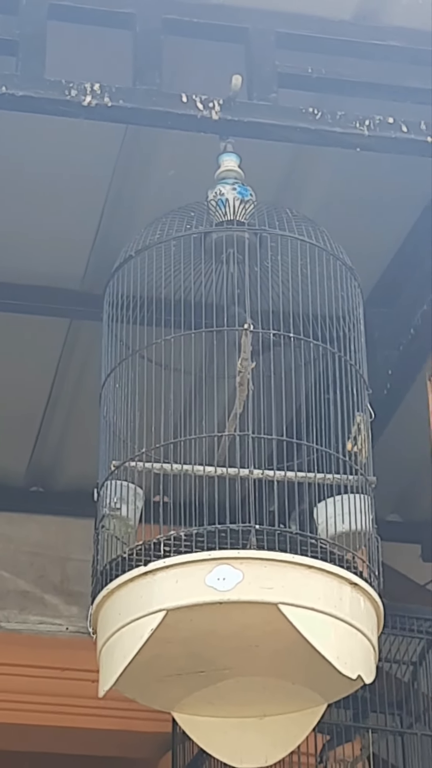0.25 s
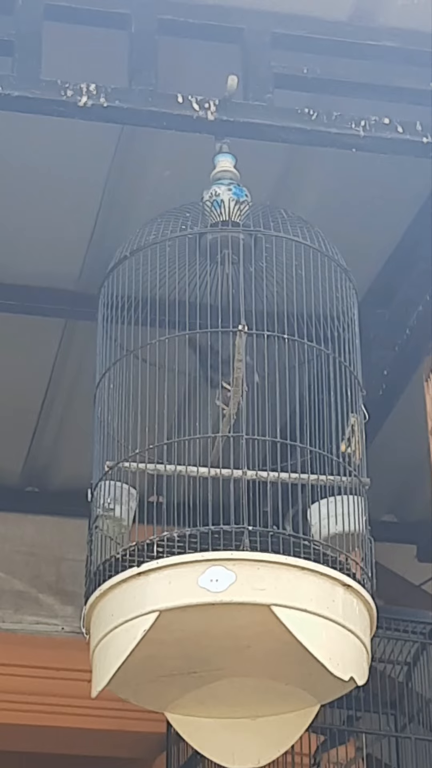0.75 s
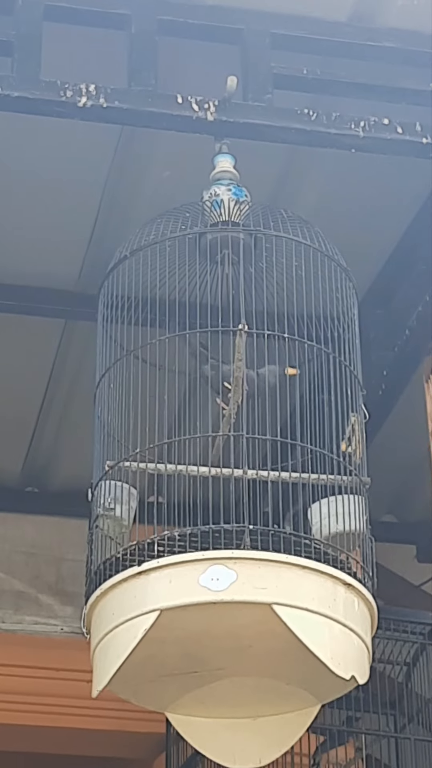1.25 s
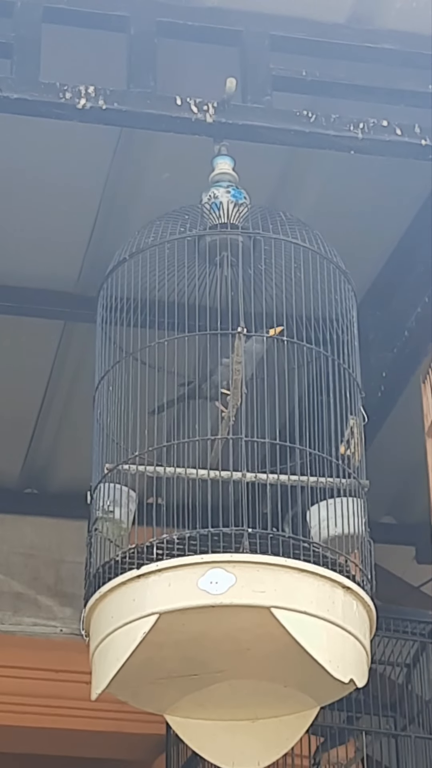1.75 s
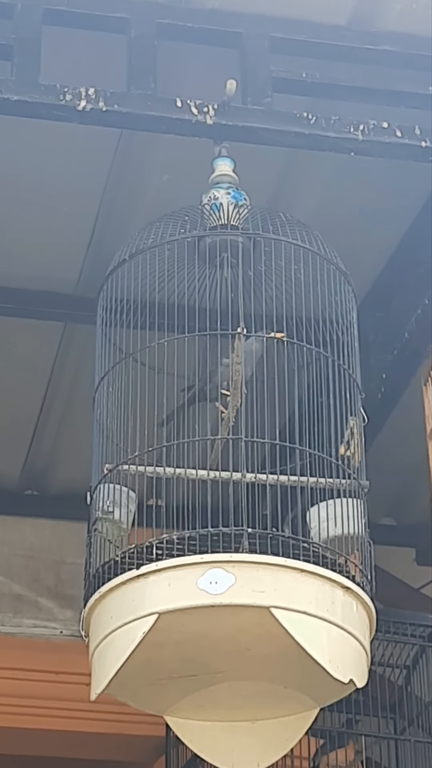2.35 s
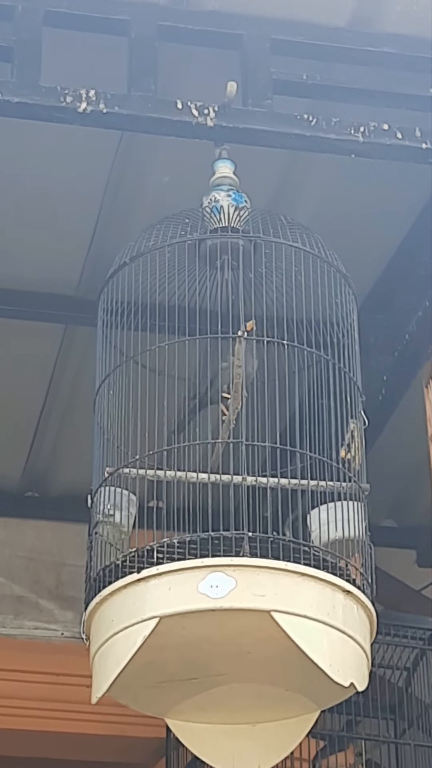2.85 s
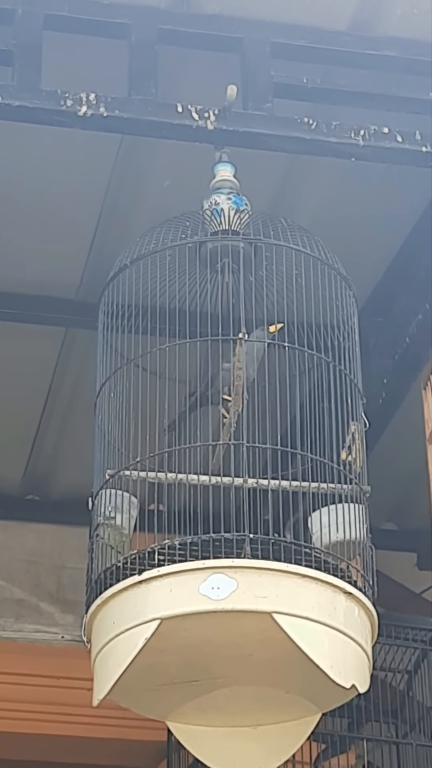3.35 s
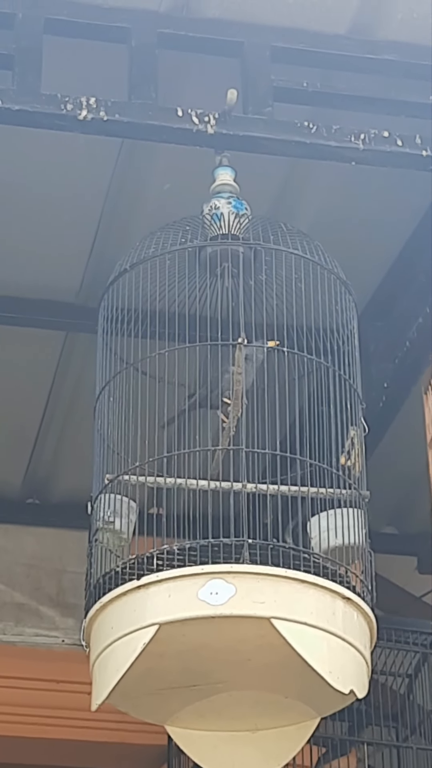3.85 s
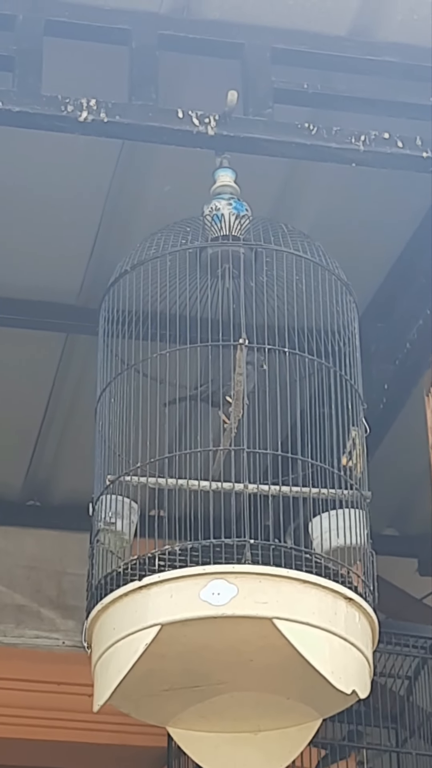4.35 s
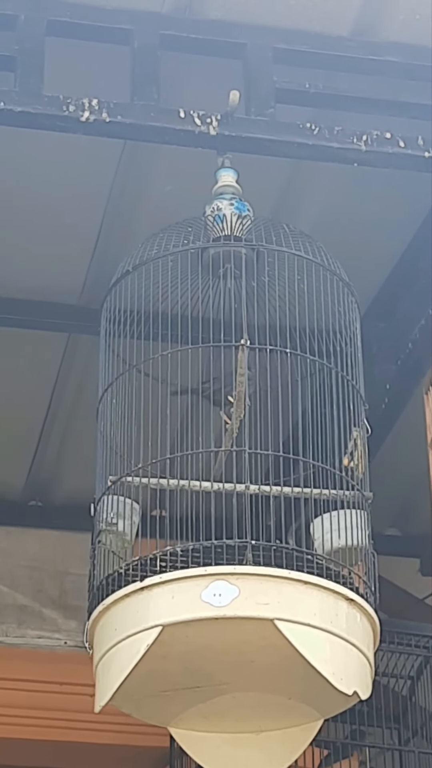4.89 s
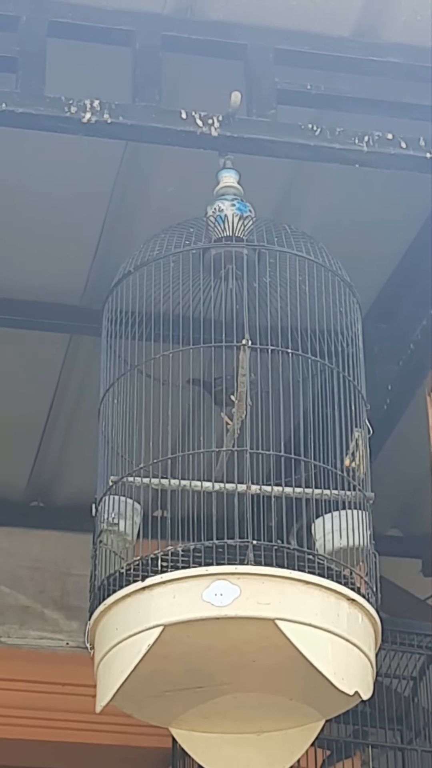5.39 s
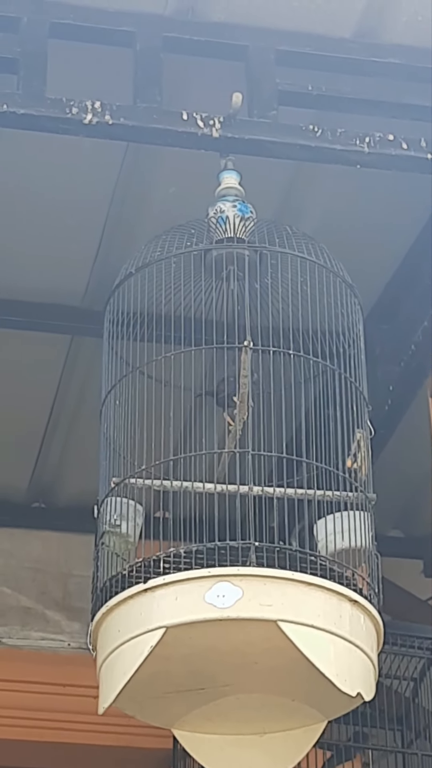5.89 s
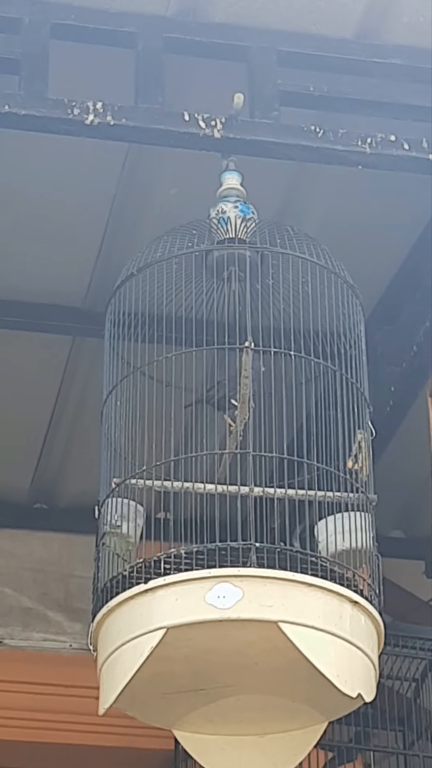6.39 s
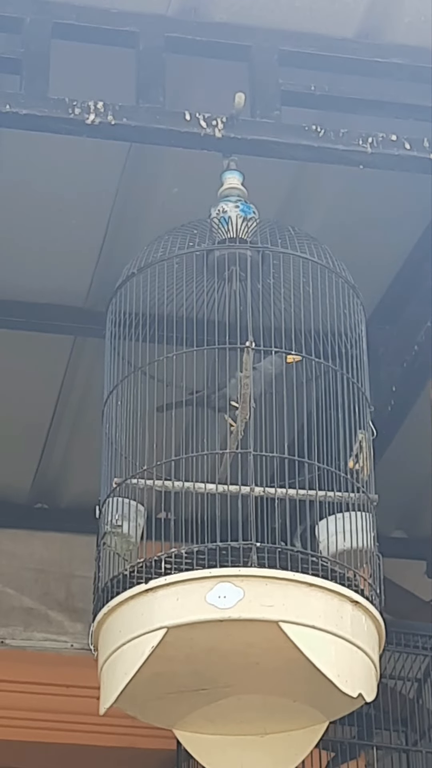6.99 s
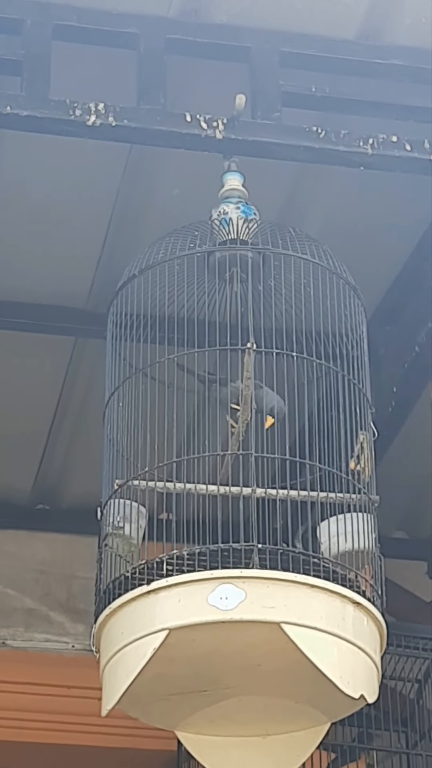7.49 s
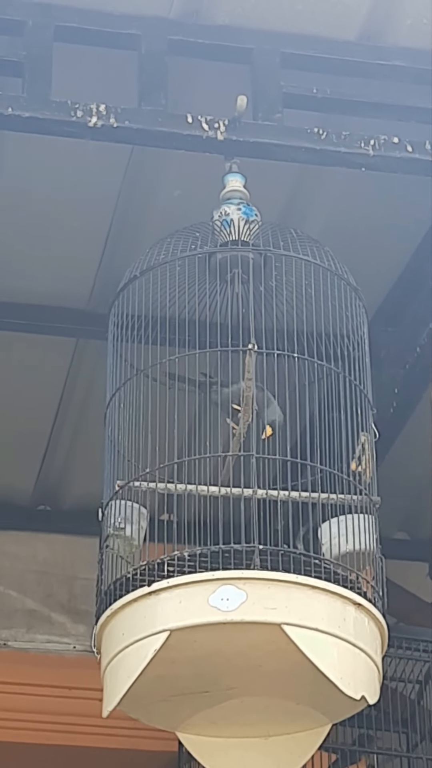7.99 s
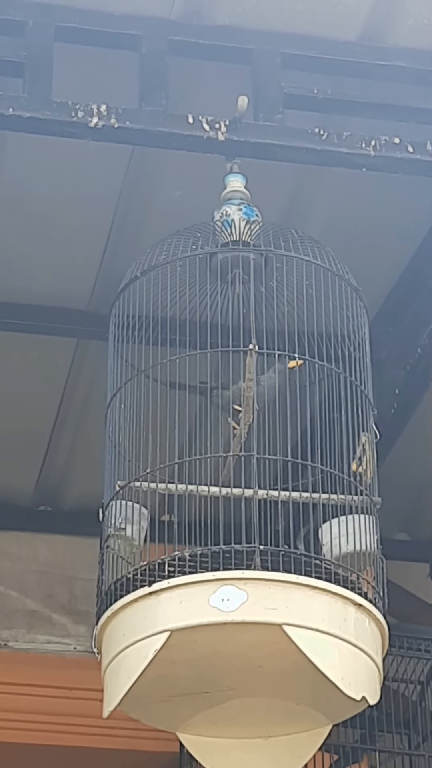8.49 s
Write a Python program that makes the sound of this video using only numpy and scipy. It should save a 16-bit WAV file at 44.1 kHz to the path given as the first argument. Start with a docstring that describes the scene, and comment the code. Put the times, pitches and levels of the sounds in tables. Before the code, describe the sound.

A clear falling whistle starts at once with a hoarse note and the tail of a buzz, followed by bright pips until 0.4 s and buzzes to 0.8 s. Quick rising chirps run from 0.5 to 1.1 s, two high arched chirps come near 1.0 and 1.2 s, and raspy scratches near 1.1-1.6 s. It thins out, with small falling chirps from 2.3 s. Mellow rising whistles at 2.9 and 3.3 s lead into a dense whistled cluster at 3.6-4.1 s. Wavering buzzes repeat from 4.2 to 5.9 s amid sharp downward chirps. Slurred whistles return at 6.4-7.1 s, mixed with rasps and scratches until 7.7 s. After a sparser moment, rising whistles at 8.2 and 8.6 s finish with high chirps. Short dense porch echoes, wavering hiss and low distant engine rumble, stronger around 4.6-6 s, accompany everything.

```python
"""A short clear whistle comes first, with a hoarse note and the end of a buzz, over low distant rumble.
Then a songbird in a hanging wire cage and other caged birds mix whistles, buzzes, scratches and chirps.
The voices are wavering tones with overtones and breath; the scratches are bursts of filtered noise.
The hard porch roof and walls answer with dense echoes made of fading noise.
Broad hiss and far traffic are coloured noise that rises and falls."""
import sys
import numpy as np
from scipy import signal
from scipy.fft import rfft, irfft
from scipy.io import wavfile
from scipy.ndimage import uniform_filter1d

SR = 44100
rng = np.random.default_rng(int(sys.argv[2]) if len(sys.argv) > 2 else 0)


def pcm_store(signal):
    """Save signal as 16-bit PCM."""
    levels = np.round(np.clip(np.atleast_2d(signal), -1, 1) * 32767)
    wavfile.write(sys.argv[1], SR, levels.astype(np.int16).T)


def attenuation_scalar(level_db):
    """Turn a level in dB into a linear amplitude multiplier (20 dB per decade)."""
    decades = np.asarray(level_db, float) / 20
    return 10 ** decades


N = 385434  # samples in the scene

# All note levels below are those before the scene is mixed.
# whistles that swell while they slur: [start t/s, length t/s, start f/Hz, end f/Hz, peak level/dB]
SLUR_NOTES = [(0, 0.073, 2926, 2685, -25), (2.92, .28, 2047, 2220, -23.5), (3.33, 0.19, 1676, 1867, -25),
              (4.38, 0.071, 2900, 2954, -37), (6.42, .22, 2090, 2238, -21), (6.72, 0.059, 1838, 1960, -26),
              (7.025, 0.083, 1952, 2094, -24.5), (8.22, .25, 1849, 2192, -21.5),
              (8.57, 0.13, 2640, 2854, -20.5)]
# struck whistles that slip onto their pitch: [start t/s, length t/s, start f/Hz, held f/Hz, peak level/dB]
PIP_NOTES = [(.135, .1, 2310, 2104, -22.5), (.22, 0.1, 2410, 2570, -47), (.335, 0.023, 3430, 3790, -28),
             (.373, 0.017, 3780, 3840, -21), (1.08, 0.043, 4890, 4970, -38.5),
             (1.28, 0.11, 5660, 5430, -47), (1.787, 0.011, 3690, 4030, -37), (1.84, 0.011, 3900, 4430, -41),
             (3.575, 0.039, 3650, 3880, -36.5), (3.642, 0.027, 2650, 2800, -20),
             (3.655, 0.1, 4880, 5020, -46), (3.8, 0.017, 3700, 3880, -35), (3.67, 0.11, 2475, 2210, -24.5),
             (3.83, 0.072, 2830, 3200, -28.5), (3.885, .1, 2426, 2300, -28), (4.13, 0.072, 4450, 4230, -36),
             (8.325, 0.12, 3880, 4020, -34.5) ]
# whistles that slow down near their end: [start t/s, length t/s, start f/Hz, end f/Hz, peak level/dB]
GLIDE_NOTES = [(3.605, 0.053, 3900, 4710, -43), (3.612, 0.047, 1986, 2700, -37),
               (3.815, 0.028, 3850, 4650, -48), (4.04, 0.1, 3290, 4475, -37.5),
               (6.765, .095, 2086, 3137, -29), (8.18, 0.064, 1613, 1475, -44.5)]
# hoarse even glides: [start t/s, length t/s, start f/Hz, end f/Hz, peak level/dB]
RASP_NOTES = [(0, 0.064, 1770, 1820, -41), (1.42, 0.24, 1289, 2317, -39), (2.58, 0.023, 1010, 985, -47.5),
              (2.77, 0.046, 1115, 1038, -48.5), (3.5, .12, 1252, 1706, -45), (4.93, 0.091, 1259, 1502, -44),
              (5.03, 0.09, 1670, 2004, -43.5), (6.25, 0.045, 1028, 1025, -49.5),
              (6.47, 0.061, 1427, 1115, -43), (6.94, 0.15, 1492, 1560, -45), (7.27, .18, 1371, 1634, -46),
              (7.7, 0.12, 1476, 1897, -46), (6.8, .1, 1180, 1507, -44), (7.17, 0.061, 3013, 3550, -35),
              (7.21, 0.046, 3647, 3420, -29), (7.26, 0.077, 3510, 3600, -40.5),
              (7.49, 0.06, 1355, 1635, -42.5), (7.56, 0.11, 1682, 2356, -37.5)]
# wide buzzing bands: [start t/s, length t/s, start f/Hz, end f/Hz, peak level/dB]
BUZZ_NOTES = [(0, 0.013, 3720, 3820, -36.5), (.35, 0.12, 4130, 3797, -35), (0.677, 0.15, 3930, 3555, -36.5),
              (4.095, 0.029, 3800, 3820, -41.5), (4.16, 0.18, 3693, 3890, -39.5),
              (4.474, 0.13, 3900, 3770, -39), (4.802, .22, 4242, 4170, -34.5),
              (5.211, 0.15, 4136, 3670, -34), (5.509, 0.2, 4220, 3554, -32),
              (5.868, 0.088, 3550, 3480, -49.5)]
# scratchy noise bursts: [start t/s, length t/s, low f/Hz, high f/Hz, level/dB]
SCOLD_BURSTS = [(0.101, 0.22, 990, 1900, -62), (0.19, 0.098, 4400, 5360, -50.5),
                (0.82, 0.1, 1000, 2280, -49.5), (1.11, 0.016, 2180, 8000, -30.5),
                (1.248, 0.091, 1730, 4300, -38), (1.375, 0.091, 2230, 3800, -41.5),
                (1.519, 0.12, 2500, 9400, -35), (1.913, 0.032, 7950, 15000, -50.5),
                (2.231, 0.18, 1750, 5830, -55), (3.55, 0.072, 2150, 5560, -49),
                (3.656, 0.047, 3170, 8500, -41), (3.828, 0.02, 6500, 6950, -37.5),
                (3.85, 0.018, 4030, 6340, -27.5), (3.95, 0.012, 4500, 9800, -43.5),
                (4.162, 0.11, 1670, 2490, -45), (4.683, 0.49, 2110, 3540, -48.5),
                (4.96, 0.11, 2350, 3420, -48), (5.882, 0.085, 4250, 8500, -39),
                (6.178, 0.034, 4700, 5950, -46.5), (6.262, 0.061, 1280, 3680, -41),
                (6.894, 0.11, 1890, 4150, -39), (7.27, 0.12, 2520, 3500, -46),
                (7.462, 0.091, 1200, 4670, -39.5), (7.544, 0.11, 2420, 8900, -41.5),
                (8.18, 0.21, 1280, 5150, -44)]
# quick sweeps: [start t/s, length t/s, start f/Hz, end f/Hz, peak level/dB]
CHIRP_NOTES = [(0.513, 0.014, 2740, 3770, -42), (0.596, 0.024, 2620, 4870, -37.5),
               (0.832, 0.03, 3610, 5950, -34.5), (0.911, 0.018, 3210, 5700, -36.5),
               (0.986, 0.044, 3100, 5730, -40.5), (1.06, 0.016, 3200, 4520, -36),
               (1.11, 0.01, 4300, 2520, -41), (1.347, 0.022, 2950, 5300, -46),
               (1.737, 0.0067, 2600, 3720, -48), (1.781, 0.0041, 2480, 4000, -37),
               (1.828, 0.012, 3210, 4600, -43), (2.339, 0.061, 4440, 1870, -45),
               (2.488, 0.06, 4430, 2240, -38), (2.609, 0.021, 5700, 3190, -35.5),
               (2.774, 0.028, 4700, 3220, -39.5), (2.983, 0.083, 5670, 3040, -43),
               (3.184, 0.095, 4910, 3220, -39), (3.353, 0.054, 5570, 4060, -49),
               (3.398, 0.055, 4200, 2765, -34), (5.02, 0.014, 4280, 5290, -35.5),
               (5.188, 0.019, 5000, 2920, -37.5), (5.382, 0.021, 5700, 2800, -30.5),
               (5.455, 0.018, 5500, 2530, -40.5), (5.506, 0.012, 4270, 2880, -46),
               (5.599, 0.014, 3600, 2320, -42), (5.86, 0.045, 4470, 2475, -45.5),
               (5.976, 0.014, 3120, 1990, -46), (6.09, 0.029, 5000, 1854, -44.5),
               (6.215, 0.041, 4420, 1925, -40), (6.327, 0.04, 5560, 4620, -40),
               (6.358, 0.031, 4190, 2060, -41), (6.691, 0.054, 5300, 2350, -39),
               (6.872, 0.043, 4720, 3250, -35), (7.065, 0.07, 5160, 3150, -35),
               (7.243, 0.08, 4620, 3950, -42), (7.518, 0.018, 4460, 3300, -36),
               (7.888, 0.04, 4430, 3000, -50), (7.96, 0.01, 3970, 2650, -42.5),
               (8.423, 0.028, 3180, 2720, -44.5), (8.683, 0.038, 3600, 6650, -38.5)]
# chirps up, over the top and down: [start t/s, length t/s, top f/Hz, end f/Hz, peak level/dB]
HOOK_NOTES = [(1.034, 0.049, 7090, 4800, -33.5), (1.193, .058, 7120, 2238, -34),
              (8.688, 0.039, 7000, 5180, -33)]
# how the throat colours the overtones: [f/Hz, level/dB]
THROAT_COLOUR = [(2000, 5), (4000, -1), (5800, 3.5), (7600, -2.5), (9700, -13.5), (11500, -0.5),
                 (13500, -10.5), (15200, -4), (19000, -51)]
# relative spectrum of air rushing past the membrane: [f/Hz, level/dB]
BREATH_COLOUR = [(710, -20.5), (1200, -15), (1570, -17), (2430, -9), (3110, -8), (3980, -6), (4530, -18.5),
                 (15500, -31)]
# relative level of the broad hiss: [t/s, level/dB]
HISS_LEVEL = [(0.0, -54), (0.46, -57), (1.19, -51.5), (1.51, -42.5), (1.68, -64), (2.14, -60.5),
              (2.46, -45.5), (2.94, -56.5), (3.72, -49), (3.97, -53.5), (4.38, -45), (4.65, -78),
              (5.57, -43.5), (6.08, -61), (7.01, -52), (8.23, -66.5), (8.37, -55), (8.74, -63)]
# relative spectrum of the hiss: [f/Hz, level/dB]
HISS_COLOUR = [(700, -1), (1500, -1.5), (3000, 1), (4500, 0.5), (7000, -5.5), (11000, -7.5), (15500, -5)]
# strength of the far engines: [t/s, level/dB]
RUMBLE_LEVEL = [(0.0, -41), (2.02, -53), (4.4, -45.5), (4.63, -36), (5.77, -42), (6.01, -37.5),
                (7.42, -49.5), (7.64, -44.5), (8.74, -51.5)]
# low resonances of the far engines: [f/Hz, width f/Hz, relative level/dB]
RUMBLE_RESONANCES = [(108.9, 60, -0.5), (179.5, 92, -4.5), (297.2, 14.4, -12)]
# relative spectrum of far traffic and air: [f/Hz, level/dB]
TOWN_COLOUR = [(18, -15), (30, -0.5), (137, -5.5), (230, -8.5), (299, -0.5), (432, -9.5), (1200, -24),
               (1820, -28), (4780, -46), (15500, -53)]

LOUD_DB = -24  # a loud note: effort is counted from here
CLEAR, SWING = 0.7, 0.6  # how clearly effort shows in the whistles; how freely the pitch swings
SLUR_FROM, SLUR_TO, SLUR_PEAK = 0.2, 0.7, 0.57  # shares of the note: slur starts, slur ends, loudest
SLUR_SWELL_DB, SLUR_FADE_DB = 21, 13.5
PIP_SLIP_S, PIP_ATTACK_S = 0.0131, 0.031
PIP_SWELL_DB, PIP_FADE_DB = 8, 13
GLIDE_PEAK, GLIDE_SWELL_DB, GLIDE_FADE_DB = 0.6, 6, 3
RASP_PEAK, RASP_SWELL_DB, RASP_FADE_DB = 0.55, 4, 4
RASP_PURE_HZ, RASP_DULL_DB_PER_KHZ = 1566, 16.5  # above this pitch the overtones drop away
BUZZ_PEAK, BUZZ_SWELL_DB, BUZZ_FADE_DB = 0.44, 6, 8
PORCH_T60_S, PORCH_TREBLE_T60_S = 0.36, 0.29  # times for the echo to fall by 60 dB
PORCH_DB = -0.5
BEAK_HZ, BEAK_WIDTH_HZ = 3750.0, 650.0
HOOK_START = 0.72  # start pitch over top pitch
HOOK_TOP_FROM, HOOK_TOP_TO = 0.25, 0.45  # shares of the note between which it stays on top
TOP_HZ = 15800  # upper end of the sound


def level(x, db):
    """Scale to an rms level."""
    return x * attenuation_scalar(db) / np.sqrt(np.mean(x ** 2))


def walk(rate, size=N):
    """Random wander: levels held 1 / rate seconds, then smoothed twice; spread near 1."""
    hold = max(int(SR / rate), 1)
    steps = np.repeat(rng.standard_normal(size // hold + 1), hold)
    smooth = uniform_filter1d(uniform_filter1d(steps, hold), hold)
    return 1.334 * smooth[:size]


def curve(rows):
    """Draw a (t/s, value) table sample by sample."""
    return np.interp(np.arange(N) / SR, *np.transpose(rows))


def noise(shape):
    """White noise filtered by the gain shape(Hz)."""
    hz = np.maximum(np.fft.rfftfreq(N, 1 / SR), 1)
    return irfft(rfft(rng.standard_normal(N)) * shape(hz), N)


def colour(points):
    """Turn (f/Hz, level/dB) points into a gain at any frequency."""
    hz, db = np.transpose(points)
    return lambda f: attenuation_scalar(np.interp(np.log(f), np.log(hz), db))


def pair(shape, alike_hz):
    """Left and right noise: nearly the same in the bass, unrelated well above alike_hz."""
    side = noise(lambda f: shape(f) * np.hypot(f, 0.09 * alike_hz) / np.hypot(f, alike_hz))
    return noise(shape) + side * np.array([[1], [-1]])


def placed(x, pan_db):
    """Left and right, a little to the left: pan_db is the gain difference between the sides."""
    return x * attenuation_scalar(np.array([[pan_db], [-pan_db]]) / 2)


def arch(share, peak, swell_db, fade_db):
    """Level along a note, dB under its peak: a rounded swell, then a rounded fade."""
    swell = swell_db * np.clip(1 - share / peak, 0, 1) ** 2
    fade = fade_db * np.clip((share - peak) / (1 - peak), 0, 1) ** 2
    return -swell - fade


def contours(rows, travel, loudness):
    """Rows to (t/s, f/Hz, level/dB) lines; travel (0-1) and loudness (dB) depend on (share, length)."""
    share = np.linspace(0, 1, num=16)
    lines = []
    for s, length, a, b, db in rows:
        hz = a + (b - a) * travel(share, length)
        lines.append(np.transpose([s + length * share, hz, db + loudness(share, length)]))
    return lines


def syrinx(notes, jitter_hz, jitter_rate, flutter_db, overtone_db, growth, throat, fade_s):
    """A membrane whose pitch wavers: a little gives a clear line, much spreads each overtone into a band.
    The throat colours the overtones; a fourth column raises or lowers them along the note."""
    out = np.zeros(N)
    for rows in notes:
        s, hz, db, *bright_db = np.transpose(rows)
        start, stop = int(s[0] * SR), min(int(s[-1] * SR), N)
        t = np.arange(start, stop) / SR
        note_db = np.interp(t, s, db)
        effort_db = note_db - LOUD_DB
        # with growth above 0, loud notes are steadier than soft ones
        unsteady = attenuation_scalar(-0.5 * growth * effort_db)
        # the swing of the pitch has limits, so the bands have firm edges
        swing = np.tanh(SWING * walk(jitter_rate, size=len(t)))
        pitch = np.interp(t, s, hz) + jitter_hz * unsteady * swing
        phase = 2 * np.pi * np.cumsum(pitch) / SR
        overtones = np.zeros(len(t))
        for k, over_db in enumerate(overtone_db, 2):
            overtones += attenuation_scalar(over_db) * throat(k * pitch) * np.sin(k * phase)
        # with growth above 0, harder singing brightens faster than it gets louder
        overtones *= attenuation_scalar(growth * effort_db)
        if bright_db:
            overtones *= attenuation_scalar(np.interp(t, s, bright_db[0]))
        edge = np.clip(np.minimum(t - s[0], s[-1] - t) / fade_s, 0, 1)
        flutter = flutter_db * unsteady * walk(jitter_rate / 2, size=len(t))
        out[start:stop] += np.sqrt(2) * (np.sin(phase) + overtones) * edge * attenuation_scalar(note_db + flutter)
    return out


def breath(voice, breath_db):
    """Add air that rushes past the membrane, rising and falling with the strength of the voice."""
    effort = np.sqrt(np.abs(uniform_filter1d(voice ** 2, size=SR // 60)))
    return voice + effort * level(noise(colour(BREATH_COLOUR)), breath_db)


def whistles():
    """The clear voice: a nearly steady membrane that slurs, slips or glides between pitches."""
    def slur(share, _):
        part = np.clip((share - SLUR_FROM) / (SLUR_TO - SLUR_FROM), 0, 1)
        return np.sin(np.pi / 2 * part) ** 2

    def slur_level(share, _):
        return arch(share, SLUR_PEAK, SLUR_SWELL_DB, SLUR_FADE_DB)

    def slip(share, length):
        return 1 - np.exp(-share * length / PIP_SLIP_S)

    def strike(share, length):
        # in short pips the peak comes no later than halfway
        return arch(share, min(PIP_ATTACK_S / length, 0.5), PIP_SWELL_DB, PIP_FADE_DB)

    def glide(share, _):
        return np.sin(np.pi / 2 * share)

    def glide_level(share, _):
        return arch(share, GLIDE_PEAK, GLIDE_SWELL_DB, GLIDE_FADE_DB)

    notes = contours(SLUR_NOTES, slur, slur_level)
    notes += contours(PIP_NOTES, slip, strike)
    notes += contours(GLIDE_NOTES, glide, glide_level)
    overtone_db = [-37.0, -44.0, -44.0, -22.5, -24.5]
    voice = syrinx(notes, 32.4, 130.6, 1.88, overtone_db, CLEAR, colour(THROAT_COLOUR), 0.00073)
    return breath(voice, -25.5)


def rasps():
    """Hoarse even glides of a wavering membrane, rich in overtones while low, purer as they climb."""
    glides = contours(RASP_NOTES, lambda share, _: share,
                      lambda share, _: arch(share, RASP_PEAK, RASP_SWELL_DB, RASP_FADE_DB))
    notes = []
    for line in glides:
        khz_above = np.maximum(line[:, 1] - RASP_PURE_HZ, 0) / 1e3
        notes.append(np.c_[line, -RASP_DULL_DB_PER_KHZ * khz_above])
    overtone_db = [-2.5, -14.5, -21.5, -13.5, -26.5, -28.0, -18.5]
    voice = syrinx(notes, 129.0, 400.0, 5.4, overtone_db, 0.0, colour(THROAT_COLOUR), 0.0015)
    return breath(voice, -10.5)


def buzzes():
    """Fast, wide wavering makes a band that drifts evenly while the breath swells and runs out."""
    notes = contours(BUZZ_NOTES, lambda share, _: share,
                     lambda share, _: arch(share, BUZZ_PEAK, BUZZ_SWELL_DB, BUZZ_FADE_DB))
    voice = syrinx(notes, 453.0, 800.0, 4.58, [6.0, -6.0, -7.0], 0.0, colour(THROAT_COLOUR), 0.0011)
    return breath(voice, -24.5)


def porch(x):
    """Dense echoes off roof and walls, strong early on, different on each side; the treble dies first."""
    t = np.arange(int(0.6 * SR)) / SR
    low = signal.butter(1, 4000.0, "low", fs=SR, output="sos")
    high = signal.butter(1, 4000.0, "high", fs=SR, output="sos")
    sides = []
    for _ in range(2):
        onset = np.clip(t / 0.0057, 0, 1) * (1 + 1.1 * np.exp(-t / 0.0028))
        grain = rng.standard_normal(len(t)) * onset
        tail = signal.sosfilt(low, grain) * attenuation_scalar(-60 * t / PORCH_T60_S)
        tail += signal.sosfilt(high, grain) * attenuation_scalar(-60 * t / PORCH_TREBLE_T60_S)
        tail /= np.sqrt(np.sum(tail ** 2))
        sides.append(signal.fftconvolve(x, tail)[:N])
    return attenuation_scalar(PORCH_DB) * np.array(sides)


def hiss():
    """Broad dry hiss that comes and goes: coloured noise with a wandering level."""
    air = level(pair(colour(HISS_COLOUR), 300.0), -1.5)
    return air * attenuation_scalar(curve(HISS_LEVEL) + 2.5 * walk(7))


def rumble():
    """Far engines boom in a few low resonances that throb on their own."""
    booms = np.zeros((2, N))
    for hz, width, db in RUMBLE_RESONANCES:
        throb = attenuation_scalar(db + 1.96 * walk(8.2))
        booms += throb * level(pair(lambda f: 1 / (1 + (2 * (f - hz) / width) ** 2), 590.0), 0)
    return level(booms, 0) * attenuation_scalar(curve(RUMBLE_LEVEL))


def town():
    """The floor of far traffic and air: coloured noise that swells a little with the rumble."""
    rumble_db = curve(RUMBLE_LEVEL)
    swell = attenuation_scalar(0.059 * (rumble_db - rumble_db.min()))
    return level(pair(colour(TOWN_COLOUR), 770.0), -48.5) * swell


def scolds():
    """Toneless scratchy bursts: uneven clicks of air in a wide resonance, sudden start, fading end."""
    out = np.zeros(N)
    for s, length, low_hz, high_hz, db in SCOLD_BURSTS:
        t = np.arange(int(length * SR)) / SR
        grit = rng.standard_normal(len(t)) * attenuation_scalar(4.6 * walk(350.0, size=len(t)))
        band = signal.butter(3, [low_hz, min(high_hz, TOP_HZ)], "band", fs=SR, output="sos")
        burst = signal.sosfilt(band, grit)
        shape = np.clip(t / 0.0021, 0, 1) * (1 - t / length) ** 0.65
        out[int(s * SR):][:len(t)] += level(burst, db) * shape
    return out


def chirps(bend):
    """Quick sweeps, slower at the high end and loudest where they come nearest the beak resonance."""
    share = np.linspace(0, 1, num=7)
    notes = []
    for s, length, a, b, db in CHIRP_NOTES:
        hz = a + (b - a) * share + bend * abs(b - a) * share * (1 - share)
        beak_db = -10 * np.log10(1 + ((hz - BEAK_HZ) / BEAK_WIDTH_HZ) ** 2)
        notes.append(np.transpose([s + length * share, hz, db + beak_db - beak_db.max()]))
    return syrinx(notes, 52.0, 280.0, 5.2, [-17.0], 0.0, colour(THROAT_COLOUR), 0.0017)


def hooks():
    """High arched chirps of the membrane with a strong octave."""
    share = np.linspace(0, 1, num=16)
    notes = []
    for s, length, top, end, db in HOOK_NOTES:
        hz = np.interp(share, [0, HOOK_TOP_FROM, HOOK_TOP_TO, 1], [HOOK_START * top, top, top, end])
        notes.append(np.transpose([s + length * share, hz, db + arch(share, 0.61, 14.5, 2.0)]))
    return syrinx(notes, 56.0, 275.0, 2.7, [-3.0], 0.0, colour(THROAT_COLOUR), 0.00097)


def scene():
    """Voices heard straight and through the porch, over hiss, rumble and floor."""
    clear = whistles()
    chatter = rasps() + buzzes() + scolds()
    quick = breath(chirps(bend=0.25) + hooks(), -11.5)
    # the whistling bird sits to the left, and so do the walls nearest to it
    left = placed(attenuation_scalar(-2.5) * clear + porch(clear), 2.3)
    middle = placed(attenuation_scalar(-8.0) * chatter + attenuation_scalar(-6.0) * quick + porch(chatter + quick), 0.57)
    return left + middle + hiss() + placed(rumble() + town(), 1.13)


def roll_off(x):
    """The treble ends steeply here."""
    return signal.sosfilt(signal.butter(12, 16470, fs=SR, output="sos"), x)


def record(dry):
    """The microphone path drops the deepest bass and ends just under 16 kHz."""
    treble_cut = signal.ellip(8, 0.2, 70, TOP_HZ, fs=SR, output="sos")
    bass_cut = signal.butter(6, 42.0, "high", fs=SR, output="sos")
    mix = signal.sosfilt(bass_cut, signal.sosfilt(treble_cut, dry))
    return roll_off(mix)


dry = scene()
out = record(dry)
pcm_store(out)
```